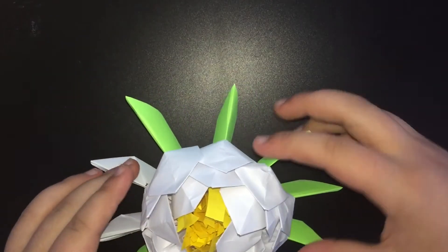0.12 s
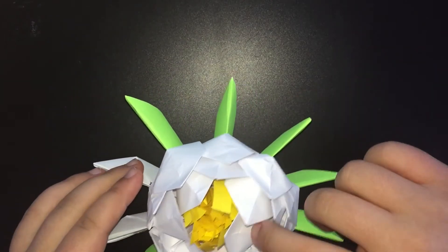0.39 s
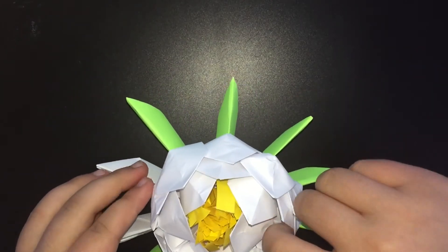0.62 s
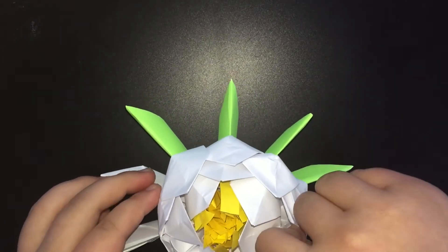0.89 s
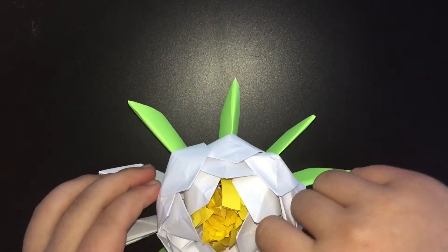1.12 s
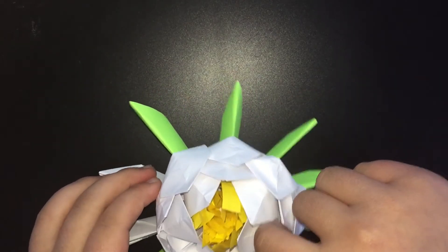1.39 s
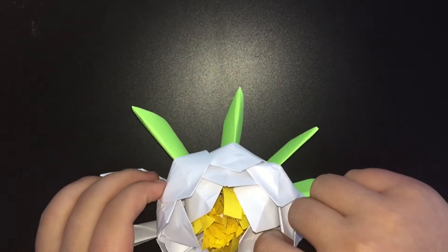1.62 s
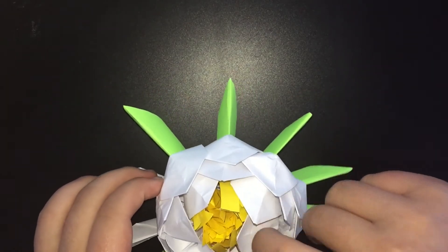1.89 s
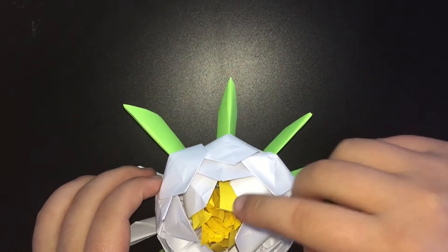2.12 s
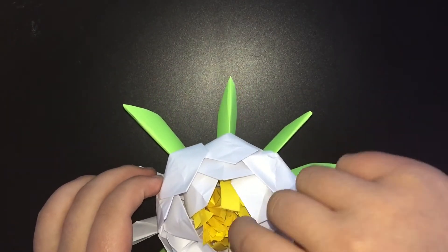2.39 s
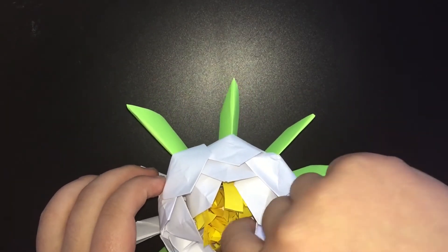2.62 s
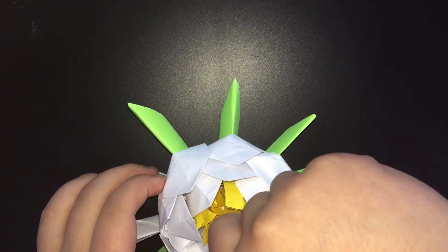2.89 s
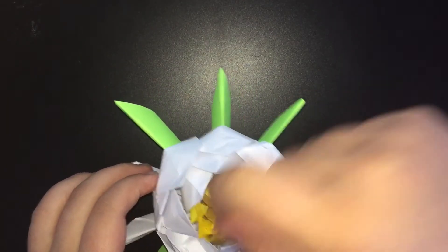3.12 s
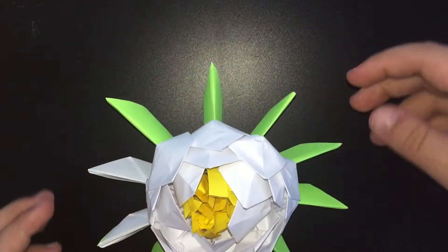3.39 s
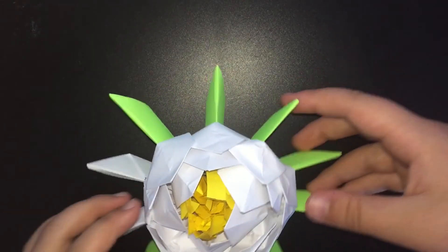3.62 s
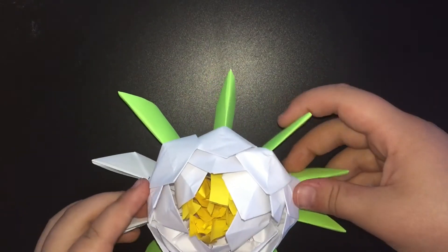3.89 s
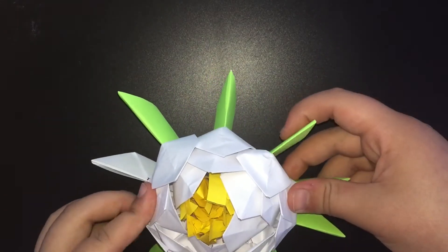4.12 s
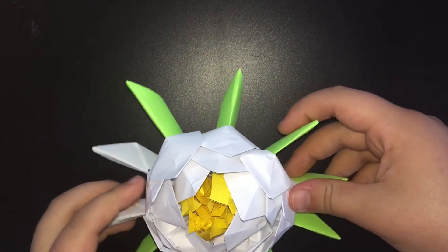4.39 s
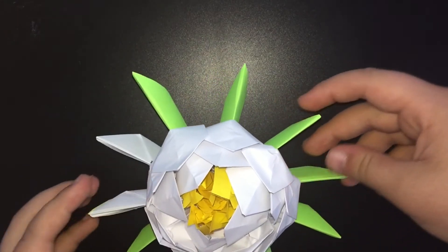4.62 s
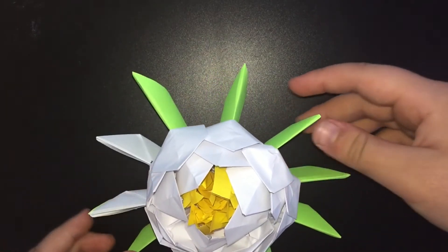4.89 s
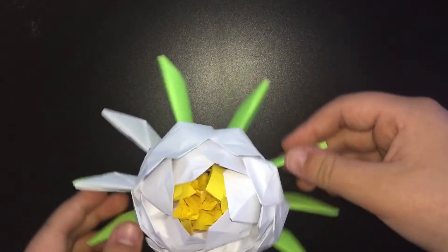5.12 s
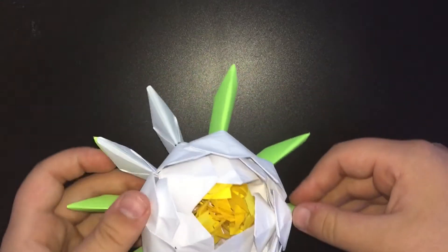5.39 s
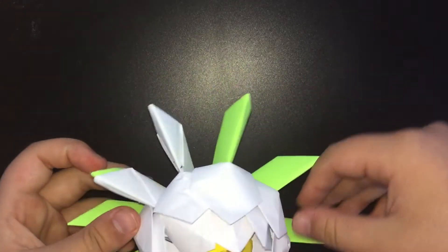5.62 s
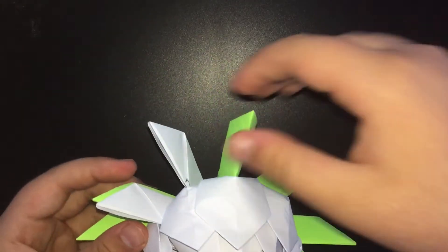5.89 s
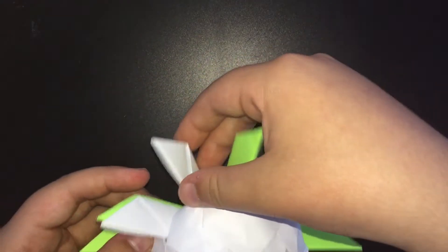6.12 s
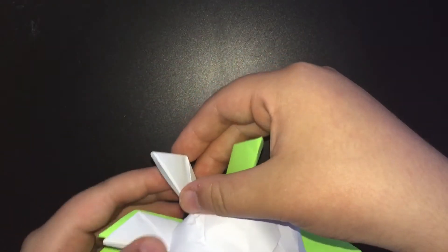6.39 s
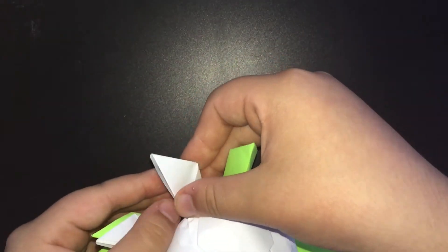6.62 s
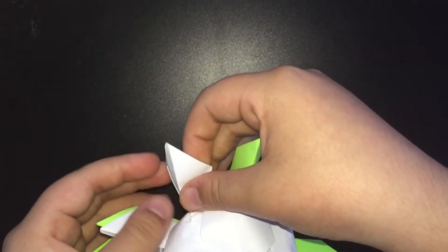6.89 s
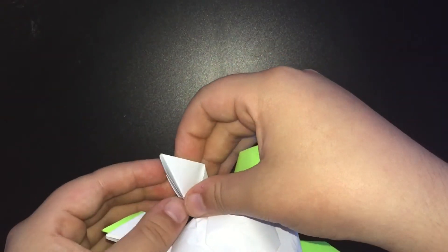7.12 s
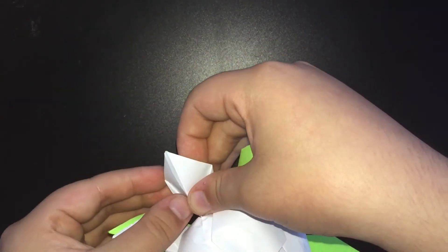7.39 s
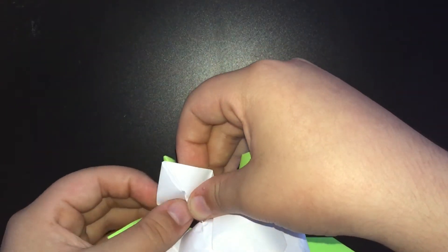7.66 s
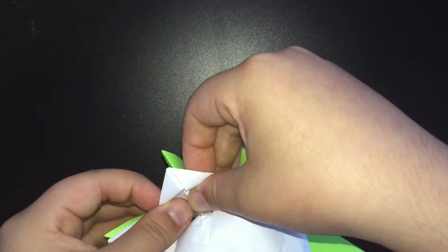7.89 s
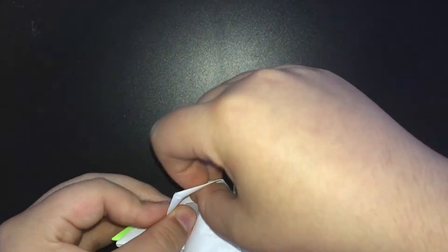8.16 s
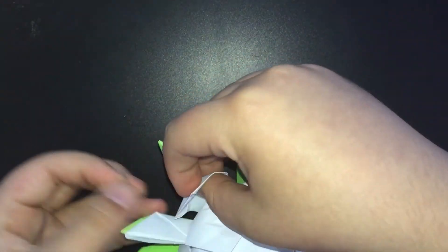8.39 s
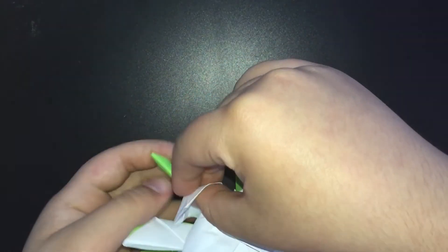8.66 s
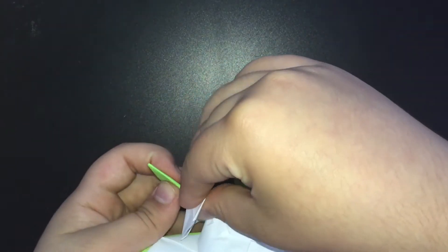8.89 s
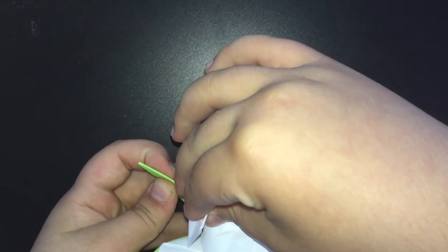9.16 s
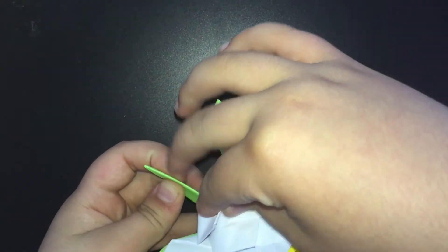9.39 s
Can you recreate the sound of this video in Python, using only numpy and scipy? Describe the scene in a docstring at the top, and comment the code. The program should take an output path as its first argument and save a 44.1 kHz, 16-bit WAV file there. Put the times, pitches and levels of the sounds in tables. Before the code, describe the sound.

Hands work on a hollow folded paper flower on a table, heard close in a quiet room. Brief soft rustles mix with irregular crisp snaps and pops, strongest around two and three seconds. After a short lull, light crackling returns with dull table knocks, becoming denser just after eight seconds and then easing into scattered rustles. Faint low hum underneath.

```python
"""Folding a paper flower

Hands fold and tuck the petals of a hollow paper flower on a table in a quiet room, close to a microphone.
Rubbing is noise, tiny slips and crackle, coloured by the paper. Creases snap as short bursts with a ring.
Dragged petal tips and short dull crunches of paper are gritty noise in a narrow band.
Rubbing and bumps drum the modes of the table top. A short tail of reflections follows the paper;
room hush and wavering low hums lie underneath."""
import sys
import numpy as np
from scipy import signal
from scipy.io import wavfile
from scipy.ndimage import uniform_filter1d

SR = 44100
rng = np.random.default_rng(int(sys.argv[2]) if len(sys.argv) > 2 else 0)


def magnitude_from_level(level_db):
    """Linear magnitude for a level in decibels (20 dB per decade)."""
    exponent = np.asarray(level_db, float) / 20
    return 10 ** exponent


def dump(signal):
    """Clip the signal to [-1, 1] and save it as 16-bit WAV at the path in sys.argv[1]."""
    limited = np.clip(np.atleast_2d(signal).T, -1, 1)
    pcm = np.round(limited * 32767).astype(np.int16)
    wavfile.write(sys.argv[1], SR, pcm)


N = 419832  # length of the scene in samples

# Rubbing strokes of the fingers: start_s, length_s, rustle_level_db, hiss_relative_to_rustle_db
RUB_STROKES = [(0.14, 0.13, -62, -12), (0.227, 0.091, -54, -11), (0.47, 0.087, -51.5, -8.5),
               (0.677, 0.062, -53.5, -5.5), (0.76, 0.11, -51.5, -13), (0.881, 0.13, -61.5, -3),
               (1.008, 0.066, -51, -16), (1.106, 0.11, -51.5, -13), (1.233, 0.058, -54, -10),
               (1.305, 0.066, -55.5, -4), (1.424, 0.15, -44.5, -7.5), (1.573, 0.062, -54.5, -6.5),
               (1.611, 0.088, -51, -3.5), (1.7, 0.026, -54, 4), (1.745, 0.14, -54, -9.5),
               (1.884, 0.15, -59, -1), (2.308, 0.067, -57.5, 2.5), (2.363, 0.16, -61, -19),
               (2.431, 0.036, -49.5, 5.5), (2.601, 0.16, -49.5, -3.5), (2.757, 0.25, -56, -8.5),
               (3.026, 0.14, -46, -2), (3.207, 0.049, -50, -12), (3.674, 0.12, -45, -9.5),
               (3.884, 0.075, -53.5, -7.5), (3.93, 0.3, -59, -10), (4.155, 0.19, -48.5, -5.5),
               (4.363, 0.25, -50, -6), (5.096, 0.06, -49.5, -8.5), (5.127, 0.2, -65.5, -1.5),
               (5.302, 0.1, -59, -6.5), (5.403, 0.18, -65, -4), (5.518, 0.24, -52.5, -2),
               (5.706, 0.093, -48, -4.5), (5.969, 0.042, -59, -32), (6.142, 0.043, -57.5, -13),
               (6.174, 0.12, -54, -4), (6.341, 0.12, -63, 5.5), (6.397, 0.21, -54, -23),
               (6.572, 0.18, -55, -1), (6.729, 0.15, -52, 4), (6.822, 0.13, -56, -5), (7.03, 0.11, -57, -7),
               (7.152, 0.081, -49.5, -22), (7.264, 0.11, -55.5, -46), (7.703, 0.1, -53, -2),
               (7.838, 0.059, -57.5, -8), (7.995, 0.14, -45, -9.5), (8.138, 0.087, -47.5, -14),
               (8.258, 0.074, -36.5, -3), (8.346, 0.15, -49, -3.5), (8.561, 0.26, -63, -4),
               (8.803, 0.13, -51.5, -3.5), (8.887, 0.21, -57, 0.5), (9.087, 0.23, -59, -13),
               (9.214, 0.09, -49, -11.5), (9.343, 0.11, -55.5, -4), (9.431, 0.11, -48, -6)]
# Creases that snap: start_s, level_db, pocket_pitch_hz
CREASE_SNAPS = [(0.826, -31, 2120), (0.9065, -17, 3360), (0.9415, -23, 2440), (1.0297, -25.5, 4450),
                (1.0446, -32.5, 2220), (1.3286, -30.5, 1780), (1.594, -30.5, 2700), (1.7, -21.5, 3200),
                (1.716, -27, 1000), (1.7669, -10, 5550), (1.9441, -10.5, 1900), (2.128, -46, 2570),
                (2.3402, -29.5, 1700), (2.4047, -38, 2340), (2.444, -27, 1610), (2.561, -37, 2340),
                (2.8392, -21, 1570), (2.906, -27, 2870), (3.054, -12, 2330), (3.226, -32, 3000),
                (3.231, -28.5, 1670), (3.251, -15, 2060), (3.272, -26, 2040), (3.9055, -17.5, 2870),
                (3.992, -35, 3940), (4.025, -35, 3400), (4.05, -36, 7000), (4.056, -34, 3430),
                (4.076, -34, 3700), (4.114, -23.5, 1850), (4.2944, -29, 1490), (4.429, -29, 2660),
                (4.451, -27, 3080), (5.1116, -29.5, 2400), (5.4618, -32, 3100), (5.4889, -27.5, 1580),
                (5.5388, -33, 1580), (5.562, -23, 3820), (5.618, -15, 860), (5.7746, -24, 1180),
                (6.028, -40, 2090), (6.222, -24, 1960), (6.289, -29, 890), (6.4127, -27.5, 2800),
                (6.422, -26.5, 3600), (6.443, -38, 2250), (6.588, -45, 7940), (6.838, -34, 6700),
                (7.047, -32.5, 1470), (7.172, -31, 2020), (7.289, -44, 1770), (7.395, -25, 1700),
                (7.421, -40, 6500), (7.4268, -23.5, 4140), (7.854, -41, 6150), (7.987, -32.5, 2040),
                (8.014, -36, 7250), (8.156, -26.5, 3430), (8.1703, -26, 1370), (8.1861, -23, 1980),
                (8.241, -34, 4470), (8.2615, -23, 5400), (8.309, -19.5, 990), (8.3143, -22, 2300),
                (8.3882, -16.5, 1720), (8.61, -35, 1180), (8.633, -30, 4050), (8.675, -33, 3900),
                (8.7828, -36, 4100), (8.8272, -25, 2420), (9.008, -32, 4240), (9.0391, -21, 2490),
                (9.3674, -26, 1530), (9.396, -26.5, 4600)]
# Narrow-band friction, petal tips dragged over the table and short dull crunches of paper:
# start_s, length_s, level_db, pitch_hz
DRAGS_AND_CRUNCHES = [(3.933, 0.65, -56, 1690), (4.827, 0.27, -67.5, 1760), (5.872, 0.063, -50.5, 1840),
                      (6.439, 0.018, -43, 1950), (7.284, 0.03, -46.5, 1200), (1.971, 0.054, -48.5, 1780),
                      (7.15, 0.12, -56, 1150), (8.28, 0.041, -34, 2240)]
# Bumps of the flower on the table top: start_s, push_level_db
TABLE_BUMPS = [(0.529, -65), (3.305, -61), (5.346, -62), (5.619, -54.5), (5.689, -58), (5.775, -61),
               (5.795, -59), (5.996, -61.5), (6.281, -58), (6.444, -55), (6.93, -60), (7.091, -56),
               (7.312, -52.5), (7.397, -52), (7.425, -54), (7.686, -62), (8.064, -52), (8.18, -55),
               (8.256, -53), (9.038, -52.5)]
# How much of the rubbing reaches the table as the flower is pressed down: time_s, share_db
PRESSING = [(0, -21.5), (5.0, -23), (5.5, -5), (9.5, -14.5)]
# Low modes of the table top: pitch_hz, width_hz, relative_level_db
TABLE_MODES = [(100.3, 24, -2.5), (224.8, 10.4, 5), (256, 9, 6), (302.7, 37, 10.5), (434.5, 27, 5),
               (615, 113, 8)]
# Colour of the rustle through the paper sheets: frequency_hz, relative_level_db (per Hz)
PAPER_COLOUR = [(350, -54), (550, -5.5), (850, -6.5), (1700, -1.5), (2700, -3), (3600, -10.5), (5000, -17),
                (7000, -20), (11000, -106)]
# Colour of the fine hiss of the paper surfaces: frequency_hz, relative_level_db (per Hz)
HISS_COLOUR = [(2200, -54), (3500, 0), (4800, -3), (6600, -1), (8000, -1), (12000, -3.5), (15000, -9)]
# Colour of the room hush: frequency_hz, relative_level_db (per Hz)
HUSH_COLOUR = [(20, -54), (45, -16.5), (84, -10.5), (120, -12.5), (160, -14.5), (300, -11.5), (380, -24),
               (520, -25), (1800, -31), (15000, -44.5)]
# Level of the lower hum over time: time_s, level_db
LOW_HUM_LEVEL = [(0, -68), (1.7, -74), (2.3, -58.5), (3.3, -61.5), (3.6, -61.5), (4.2, -64.5), (5.1, -61.5),
                 (6.2, -71.5), (6.5, -54), (7.0, -57), (7.2, -66), (9.5, -57)]
# Level of the upper hum over time: time_s, level_db
UPPER_HUM_LEVEL = [(7.3, -73), (7.8, -64), (9.5, -59)]

SPAN, LEAD = 2048, 512  # samples computed after a snap or bump, and before a snap


def rustle():
    """Sliding, slips and crackle come in clumps and sound through the sheets and their surfaces."""
    clumps = uniform_filter1d(uniform_filter1d(rng.standard_normal(N), size=300), size=200)
    clumps = magnitude_from_level(1.97 * unit_rms(clumps))  # the level wanders by about 2 dB
    sliding = 0.75 * rng.standard_normal(N)
    slips = 0.4 * grit(per_s=1200, spread_db=3.5)
    drive = unit_rms(clumps * (sliding + slips + 0.4 * crackle()))
    body = coloured(drive, PAPER_COLOUR, patchy_db=4.5, size=512)
    hiss = coloured(drive + 0.32 * rng.standard_normal(N), HISS_COLOUR, patchy_db=2.5)
    return strokes() * body + strokes(hiss=True) * hiss


def strokes(hiss=False):
    """Overlapping strokes add in power; the sheets keep stirring faintly around each one."""
    power = np.zeros(N + SR)
    for start, length, db, hiss_db in RUB_STROKES:
        shape = fade(length)
        level = magnitude_from_level(db + hiss * hiss_db)
        power[round(max(start, 0) * SR):][:len(shape)] += (level * shape) ** 2
    stir = abs(uniform_filter1d(uniform_filter1d(power, size=4000), size=3000))
    return np.sqrt(power + magnitude_from_level(-10.0) ** 2 * stir)[:N]


def fade(length):
    """Friction fades in, holds and fades out over one stroke."""
    rise, fall = 0.22, 0.33  # shares of the stroke's length
    u = np.arange(0, 1, 1 / (max(length, 0.01) * SR))
    ramp = np.clip(np.minimum(u / rise, (1 - u) / fall), 0, 1)
    return np.sin(np.pi / 2 * ramp) ** 2


def crackle(count=12):
    """Each slip rings one small facet of the paper for a cycle or two."""
    out, t = np.zeros(N), np.arange(400) / SR
    for hz in np.geomspace(1400, 10000, count):
        facet = np.sin(2 * np.pi * hz * t) * np.exp(-hz * t / 1.5)
        facet *= np.sqrt(hz)  # makes up for the shorter ring of high facets
        out += signal.oaconvolve(grit(per_s=80, spread_db=3.8), facet)[:N]
    return unit_rms(out)


def grit(per_s, spread_db, size=16):
    """Friction slips at random moments, most of them small and a few large."""
    draw, out = rng.random((N // size, 4)), np.zeros(N)  # one possible slip in every `size` samples
    height = magnitude_from_level(spread_db * np.minimum(-np.log(1 - draw[:, 0]), 5))
    sign = np.sign(draw[:, 1] - 0.5)
    happens = draw[:, 2] < per_s * size / SR
    at = ((np.arange(len(draw)) + draw[:, 3]) * size).astype(int)
    out[at] = height * sign * happens
    return unit_rms(out)


def snaps():
    """A crease strains and lets go: a crack, a burst at the pocket's pitch, gritty settling and a ring."""
    sag_per_s = 6.4  # the pocket opens and its pitch falls, at twice this share per second
    out, t = np.zeros(N + SPAN), np.arange(SPAN) / SR
    noise = rng.standard_normal((len(CREASE_SNAPS), 2, SPAN))
    treble = signal.butter(4, [4500, 15200], "band", fs=SR, output="sos")
    mid = signal.butter(3, [1000, 9000], "band", fs=SR, output="sos")
    overtones = rng.uniform(1.3, 3, (len(CREASE_SNAPS), 3))  # uneven multiples of the pitch
    onset = 1 - np.exp(-t / 0.00026)
    for (start, db, hz), (a, b), multiples in zip(CREASE_SNAPS, noise, overtones):
        at = round(start * SR)
        ring = 0.55 * np.sin(2 * np.pi * hz * t * (1 - sag_per_s * t))
        ring *= magnitude_from_level(-60 * np.sqrt(hz) * t / 0.42)  # small pockets, with high pitches, die sooner
        for k in multiples:
            ring += 0.094 * np.sin(2 * np.pi * hz * k * t) * magnitude_from_level(-60 * k * t / 0.017)

        burst = unit_rms(resonate_twice(signal.sosfilt(mid, a), hz, width=1.95 * hz))
        burst *= 0.54 * magnitude_from_level(-60 * t / 0.0084)  # falls by 60 dB in 8.4 ms
        settle = unit_rms(resonate(signal.sosfilt(mid, b * abs(a)), hz, width=2400))
        settle *= 0.097 * magnitude_from_level(-60 * t / 0.021)

        # small pockets and louder snaps crack brighter
        crack_db = -15.5 + 2 * np.log2(hz / 2000) + 0.02 * (db + 30)
        crack = magnitude_from_level(crack_db - 60 * t / 0.0085) * unit_rms(signal.sosfilt(treble, b))
        out[at:][:SPAN] += magnitude_from_level(db) * onset * (ring + burst + crack + settle)

        # the crease creaks just before it gives: a decay turned around in time
        creak = unit_rms(resonate(signal.sosfilt(mid, (a * abs(b))[-LEAD:]), hz, width=2800))
        creak *= magnitude_from_level(db - 19.5 - 60 * t[:LEAD] / 0.01)
        out[at - LEAD:][:LEAD] += creak[::-1]
    return out[:N]


def drags_and_crunches():
    """Gritty friction sounds through one resonance: a dragged petal tip or a short dull crunch."""
    out = np.zeros(N)
    drive = rng.standard_normal(N) + 1.3 * grit(per_s=640, spread_db=1.0)
    for start, length, db, hz in DRAGS_AND_CRUNCHES:
        at, shape = round(start * SR), fade(length)
        tone = unit_rms(resonate(drive[at:][:len(shape)], hz, width=0.21 * hz))
        out[at:][:len(shape)] += magnitude_from_level(db) * shape * tone
    return out


def table():
    """Rubbing and bumps of the flower drive the low modes of the table top."""
    drive = magnitude_from_level(curve(PRESSING)) * strokes() * rng.standard_normal(N)
    t, noise = np.arange(SPAN) / SR, rng.standard_normal((len(TABLE_BUMPS), SPAN))
    push = 5.1 * t / 0.00059 * np.exp(-t / 0.00051)
    for (start, db), rough in zip(TABLE_BUMPS, noise):
        scuffle = 0.41 * np.exp(-t / 0.021) * unit_rms(uniform_filter1d(rough, size=40))
        drive[round(start * SR):][:SPAN] += magnitude_from_level(db) * (push + scuffle)
    out = np.zeros(N)
    for k, (hz, width, db) in enumerate(TABLE_MODES):
        mode = magnitude_from_level(db) * resonate(drive, hz, width) / np.sqrt(width)
        out += (-1) ** k * mode  # neighbouring modes have opposite signs
    return 40 * out


def room(x):
    """Scattered reflections form a short dull tail that falls by 60 dB in 0.19 s."""
    t = np.arange(SR // 3) / SR
    tail = rng.standard_normal(len(t)) * magnitude_from_level(-60 * t / 0.19) * (t > 0.003)
    tail = signal.lfilter([1], [1, -0.6], tail)  # dulls the treble
    return signal.fftconvolve(x, tail / np.linalg.norm(tail))[:N]


def hums():
    """A steady tone blurred by narrow noise, and a higher hum of narrow noise alone, both waver."""
    low_hz, upper_hz = 58.6, 83.5
    blur = unit_rms(resonate_twice(rng.standard_normal(N), low_hz, width=13.0))
    low = unit_rms(np.sin(2 * np.pi * low_hz * np.arange(N) / SR) + 0.87 * blur)
    upper = unit_rms(resonate_twice(rng.standard_normal(N), upper_hz, width=22.0))
    return magnitude_from_level(curve(LOW_HUM_LEVEL)) * low + magnitude_from_level(curve(UPPER_HUM_LEVEL)) * upper


def hush():
    """Room noise of steady level, mostly low in pitch, with a slightly drifting colour."""
    return magnitude_from_level(-61) * coloured(rng.standard_normal(N), HUSH_COLOUR, patchy_db=4.0, size=2048)


def unit_rms(x):
    """Scales a sound to an average (rms) level of 1."""
    return x / np.sqrt(np.mean(abs(x) ** 2) + 1e-20)


def curve(rows):
    """Reads a time table at every sample, with straight lines between its rows."""
    return np.interp(np.arange(N) / SR, *np.transpose(rows))


def coloured(x, points, patchy_db=0, size=256):
    """Shapes a sound by a spectrum whose colour drifts in random patches."""
    hz, _, z = signal.stft(x, SR, nperseg=size, noverlap=size * 3 // 4)
    point_hz, point_db = np.transpose(points)
    patches = uniform_filter1d(rng.standard_normal(z.shape), size=3, axis=0)  # across frequency
    patches = unit_rms(uniform_filter1d(patches, size=14, axis=1))  # across time
    colour_db = np.interp(np.log(hz + 1), np.log(point_hz + 1), point_db)
    z = z * magnitude_from_level(colour_db[:, None] + patchy_db * patches)
    shaped = signal.istft(z, SR, nperseg=size, noverlap=size * 3 // 4)[1]
    return unit_rms(shaped[:N])


def resonate(x, hz, width):
    """A decaying resonance passes its own pitch with a gain of about 1; width is in Hz."""
    r = np.exp(-np.pi * width / SR)
    return 2 * signal.lfilter([1 - r], [1, -r * np.exp(2j * np.pi * hz / SR)], x).real


def resonate_twice(x, hz, width):
    """Two equal resonances in a row cut more steeply around the pitch."""
    return resonate(resonate(x, hz, width), hz, width)


def scene():
    """Paper and table sounds, with reflections of the paper, over hush and hums."""
    paper = rustle() + snaps() + drags_and_crunches()
    return (paper + magnitude_from_level(-13.5) * room(paper) + table() + hums() + hush())[None]


def top_cut(x):
    """Nothing passes above the cut-off."""
    return signal.sosfilt(signal.butter(12, 16460, fs=SR, output="sos"), x)


def record(dry):
    """The microphone has a narrow treble dip; a low-pass then limits the top of the band."""
    heard = dry - 0.55 * resonate(dry, hz=10400, width=360)
    low_pass = signal.firwin(301, 15600, fs=SR)
    heard = signal.oaconvolve(heard, low_pass[None], "same")
    return top_cut(heard)


dry = scene()
out = record(dry)
dump(out)
```